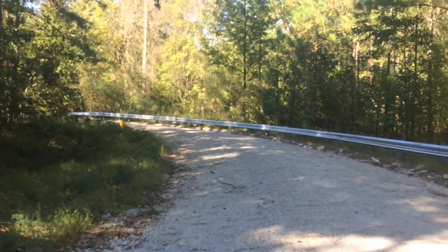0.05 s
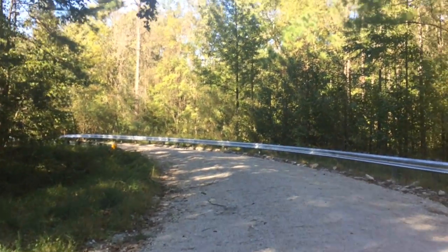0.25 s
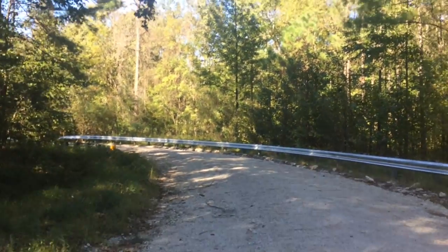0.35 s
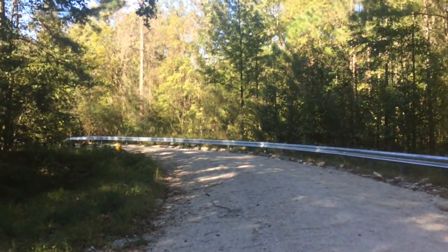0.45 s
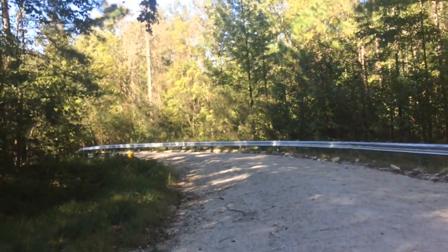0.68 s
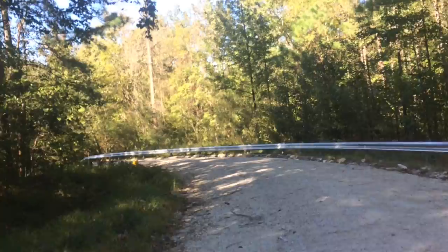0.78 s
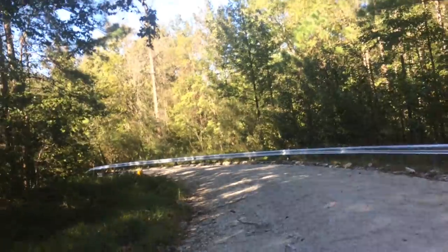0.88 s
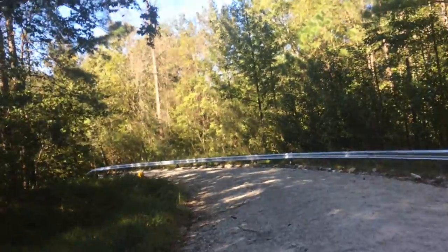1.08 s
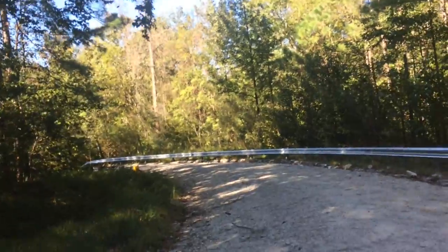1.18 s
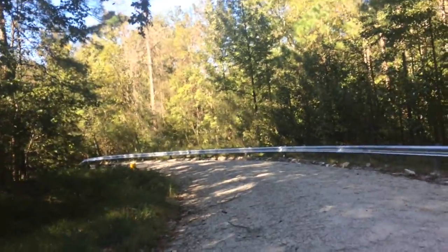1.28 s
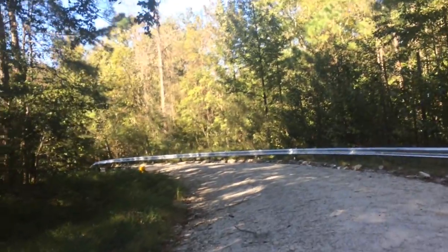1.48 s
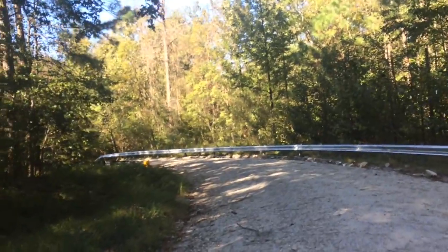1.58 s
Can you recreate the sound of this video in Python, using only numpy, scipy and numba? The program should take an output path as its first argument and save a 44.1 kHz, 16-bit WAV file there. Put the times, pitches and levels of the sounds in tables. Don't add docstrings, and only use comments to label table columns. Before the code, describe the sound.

Someone walks slowly on a stony woodland road; a heavy crunch scatters small stones, a lighter step and a lone stone crack follow, then a last soft step with a barely audible cricket, phone microphone nearby.

```python
import sys
import numpy as np
from scipy import signal
from scipy.fft import rfft, irfft
from scipy.io import wavfile
from scipy.ndimage import uniform_filter1d
from numba import njit

SR = 44100
rng = np.random.default_rng(int(sys.argv[2]) if len(sys.argv) > 2 else 0)


def gain_from_db(level_db):
    decades = np.asarray(level_db, float) / 20
    return 10 ** decades


def persist_wave(psi):
    counts = np.round(np.clip(psi, -1, 1) * 32767).astype(np.int16)
    wavfile.write(sys.argv[1], SR, np.atleast_2d(counts).T)


N = 72765

# pitch_hz, density_db (per Hz)
TREE_HISS = [
    (15, -36),
    (25, 1),
    (146, -4.5),
    (264, -13),
    (558, -16),
    (978, -18.5),
    (2930, -33.5),
    (5140, -36),
    (15000, -48),
]
# pitch_hz, width_hz, level_db
RUMBLE_BANDS = [
    (80, 62, -53),
    (142.5, 20.4, -53),
    (183.7, 20.7, -57.5),
]
# start_s, length_s, level_db
CRICKET_CHIRPS = [
    (1.428, .028, -65),
    (1.452, .036, -70),
    (1.496, .03, -73),
    (1.612, .025, -73),
]

# start_s, stones_db, thud_db and grit_db (both re stones), decay_s
HEAVY_STEP = [(0.236, -22.5, -4.5, -18, 0.027), (0.246, -19.5, 6.5, -7, 0.0078),
              (0.262, -19, -1, -14.5, 0.011), (0.274, -24, -8, -7, 0.0098), (0.287, -22.5, 4, -11, 0.0078),
              (0.299, -25.5, -1, -23, 0.0063), (0.309, -37, -14, -31, 0.016),
              (0.335, -26, -1.5, -13.5, 0.0065), (0.347, -26.5, -6.5, -17.5, 0.012),
              (0.356, -33.5, -23, -16, 0.01), (0.394, -35, -7, -15, 0.026), (0.431, -41, -18, -17, 0.031),
              (0.453, -32.5, -11, -16, 0.0065)]
SECOND_STEP = [
    (0.929, -29, -8, -16.5, 0.0076),
    (0.936, -44, -9, -16, 0.014),
    (0.946, -33.5, 2, -13, 0.011),
    (0.959, -40, -12, -14, 0.015),
    (0.973, -37.5, -9, -17, 0.019),
    (0.993, -30, -13, -20, 0.0045),
    (0.999, -30.5, -23, -17.5, 0.0075),
    (1.011, -28.5, -30, -21.5, 0.01),
    (1.041, -42, -18, -18, 0.015),
    (1.149, -42.5, -18, -18, 0.024),
]
LAST_STEP = [(1.413, -48.5, -13, -8.5, 0.028), (1.472, -43.5, -0.5, -12.5, 0.041),
             (1.495, -41.5, -25, -6, 0.017), (1.506, -35.5, -4, -12.5, 0.014),
             (1.514, -35.5, -7.5, -18, 0.023), (1.527, -29.5, -6.5, -11, 0.01),
             (1.542, -28.5, -13, -20, 0.011), (1.552, -27.5, -33, -16.5, 0.0096),
             (1.561, -32.5, -31, -15, 0.0061), (1.584, -44, -4, -8.5, 0.022),
             (1.618, -40.5, -4.5, -14.5, 0.01), (1.636, -47.5, -10, -6, 0.015)]

# start_s, peak_db, pitch_hz, cycles
SOLE_THUMPS = [
    (.2472, -21.5, 379, 3.4),
    (.236, -21.5, 236, 1.35),
    (0.261, -36.5, 200, 1.5),
    (.269, -20, 131, 1.95),
    (0.24, -31, 98, 1.4),
    (0.96, -38, 520, 2),
    (1.523, -39, 1080, 9),
    (1.534, -39, 1090, 7),
]
# start_s, peak_db, pitch_hz, top_db (bright part re peak)
PEBBLE_TICKS = [(0.2981, -23, 6270, -11), (0.426, -53, 2620, -9), (0.455, -40, 2500, -1),
                (0.4746, -40, 9640, -2), (0.477, -40.5, 2360, -4), (0.4939, -39, 3930, -8),
                (0.4995, -38, 3060, -25), (0.5207, -34.5, 2620, -21), (0.5505, -50, 2780, 11),
                (0.5615, -38.5, 3470, 5), (0.595, -44.5, 4730, 9), (0.6186, -28.5, 4530, -20),
                (0.6241, -38.5, 5130, -4), (0.6098, -54, 3460, 0), (0.645, -54, 4600, -8),
                (0.6584, -49, 4300, 2), (0.6662, -50, 3240, 8), (0.683, -58, 4000, -10),
                (0.7112, -37.5, 2420, -7), (0.752, -37, 2550, 0), (0.7748, -38, 2400, -0.5),
                (0.7802, -53, 4000, 4), (0.8762, -48, 3500, 5), (0.8507, -50, 2900, 2),
                (0.8549, -46, 2680, -1),
                (1.0088, -32.5, 6160, 3),
    (1.0975, -49, 4000, 2),
    (1.1503, -51, 3640, 0),
    (1.296, -52, 5000, 8),
    (1.3576, -49, 4760, -10),
    (1.5251, -38, 4700, -21),
    (1.5515, -36.5, 4860, -9),
    (1.586, -46, 3500, -16),
    (0.348, -42, 4800, -8),
    (0.3685, -46, 5800, -8),
]
# start_s, peak_db
SAND_TICKS = [(0.3234, -46), (0.3704, -52), (0.4074, -51), (0.4394, -52), (0.4623, -45), (0.5152, -45),
              (0.5546, -43), (0.6304, -48), (0.6574, -54), (0.7164, -58), (0.7946, -55), (0.8081, -51),
              (0.8759, -49), (0.9567, -52)]

# peak_s, peak_db,
# pitch_hz
HEEL_CRACKS = [(0.2396, -23.5, 1860), (0.2421, -32, 1320), (0.2467, -40, 2790), (0.2472, -22, 1480),
               (0.2504, -17, 390), (0.2534, -32, 1320), (0.2628, -21.5, 1760), (0.2665, -26, 700),
               (0.2682, -25, 1170), (0.274, -27.5, 2220), (0.274, -28, 1320), (0.2756, -19.5, 490),
               (0.281, -42, 3320), (0.2812, -29, 1320), (0.2855, -19, 520), (0.2868, -40, 1110),
               (0.289, -29, 1860), (0.2922, -30, 2350), (0.2941, -31, 1480), (0.299, -29, 2350)]
TOE_CRACKS = [
    (0.3364, -33, 1860),
    (0.3397, -37, 1050),
    (0.3417, -32.5, 350),
    (0.3453, -30, 1800),
    (0.3493, -29, 710),
    (0.3494, -30.5, 1820),
    (0.3594, -32, 1170),
    (0.3595, -32.5, 700),
]
SECOND_STEP_CRACKS = [(0.931, -32, 950), (0.931, -44, 1670), (0.9317, -36, 470), (0.943, -48, 1310),
                      (0.9504, -33.5, 1210), (0.9563, -38, 1170), (0.9619, -35, 920), (0.9938, -29, 1220),
                      (1.0015, -48, 930), (1.0044, -39, 1320), (1.0134, -30, 1550), (1.0141, -29.5, 1020),
                      (1.0214, -44, 1480), (1.0244, -45, 1470), (1.0436, -40, 1230)]
LAST_STEP_CRACKS = [(1.513, -39, 1690), (1.517, -34, 1760), (1.521, -35, 1170), (1.5244, -38, 1450),
                    (1.5264, -30.5, 3120), (1.5312, -29, 1330), (1.5314, -37, 2600), (1.5364, -38.5, 1130),
                    (1.5514, -33, 2800), (1.553, -42, 1770), (1.5552, -30.5, 1660), (1.5618, -34, 1480),
                    (1.561, -37, 1080)]
SCATTERED_CRACKS = [
    (0.2998, -28, 570),
    (0.3105, -33.5, 700),
    (0.4955, -38, 1370),
    (1.0996, -24, 1177),
    (1.1003, -31.5, 1700),
    (1.109, -55, 1260),
                    (0.2355, -35, 1260), (0.2640, -26, 480), (0.3125, -39, 900), (0.3250, -40, 1610),
                   (0.3990, -43, 990), (0.4030, -43, 420), (0.4340, -44, 900), (0.4460, -43, 1150),
                   (0.4560, -43, 1300), (0.4630, -44, 800), (0.9665, -40, 606), (1.1520, -47.5, 1150),
                   (1.4750, -44, 905), (1.5085, -39, 1500), (1.5450, -37, 1050), (1.5690, -49, 1310)]

# lowest_hz, highest_hz, cycles, grains_per_s, size_scatter_db, trim_db
SOLE_GRAINS = (69, 179, 3, 303.5, 4.5, -7.5)
THUD_GRAINS = (313, 685, 1.59, 1200, 2.5, -4)
STONE_GRAINS = (916, 2038, 2, 4000.5, 2, -8.5)
GRIT_GRAINS = (1976, 5515, 1.5, 12000, 0.5, -2.5)
SAND_GRAINS = (5492, 15000, 7, 20001.5, -0.5, -11)
SCRAPE_GRAINS = (5300, 7660, 6.9, 7999, 4.8, 4.7)
CRACKLE_GRAINS = (2500, 14000, 2, 400, 4, 0)


def band(hz, width):
    f = np.arange(N // 2 + 1) * SR / N
    bell = 1 / (1 + (2 * (f - hz) / width) ** 4) ** .5
    x = irfft(rfft(rng.standard_normal(N)) * bell, N)
    return x / x.std()


def walk(rate):
    k = int(SR / rate)
    x = uniform_filter1d(uniform_filter1d(rng.standard_normal(N), k), k)
    return (x - x.mean()) / x.std()


@njit
def ring(at, hz, cycles, size):
    y = np.zeros(N)
    for g in range(len(at)):
        turn = np.exp((2j * np.pi - 1 / cycles[g]) * hz[g] / SR)
        soften = np.exp(-2 * hz[g] / SR)
        z, contact = 2 * size[g] + 0j, 1.
        for i in range(int(at[g]), min(N, int(at[g] + 6 * cycles[g] * SR / hz[g]))):
            z *= turn
            contact *= soften
            y[i] += z.imag * (1 - contact)
    return y


def rings(start_s, hz, cycles, size):
    start_s, hz, cycles, size = np.array(np.broadcast_arrays(start_s, hz, cycles, size), float)
    return ring(start_s * SR, hz, cycles / 2, size)


def swell(start_s, db, decay_s, rise_s):
    start_s, db, decay_s = (np.reshape(v, (-1, 1)) for v in (start_s, db, decay_s))
    dt = np.arange(N) / SR - start_s
    rise = np.clip(dt / rise_s + .5, 0, 1)
    fall = np.exp(-np.maximum(dt, 0) / np.maximum(decay_s, .002))
    return np.sqrt(np.sum((gain_from_db(db) * rise * fall) ** 2, axis=0))


def grains(family, pressure):
    lo_hz, hi_hz, cycles, rate, scatter_db, trim_db = family
    u = rng.random((40000, 4))
    at = np.cumsum(-np.log(1 - u[:, 0])) / rate * SR
    u, at = u[at < N], at[at < N]
    hz = lo_hz * (min(hi_hz, .45 * SR) / lo_hz) ** u[:, 1]
    sign = np.sign(u[:, 3] - .5)
    size = gain_from_db(scatter_db * np.minimum(-np.log(1 - u[:, 2]), 4)) * sign
    size = size / np.sqrt(np.mean(size ** 2 * cycles / hz) * rate / 4)
    return rings(at / SR, hz, cycles, size * pressure[at.astype(int)] * gain_from_db(trim_db))


def tree_hiss():
    hz, db = np.array(TREE_HISS).T
    swell_db, flicker_db = 0, 2.5
    out, gust = 0, walk(1.5)
    for f in 28 * 2 ** np.arange(0, 9.2, 1 / 3):
        level_db = np.interp(np.log(f), np.log(hz), db) + swell_db * gust + flicker_db * walk(17)
        out = out + band(f, f / 4) * np.sqrt(f) * gain_from_db(level_db)
    return out / out.std() * gain_from_db(-50)


def rumble():
    return sum(gain_from_db(db + 0.49 * walk(12.0)) * band(hz, width) for hz, width, db in RUMBLE_BANDS)


def cricket():
    t = np.arange(N) / SR
    env = 0
    for start_s, length_s, db in CRICKET_CHIRPS:
        env = env + gain_from_db(db) * np.sin(np.pi * np.clip((t - start_s) / length_s, 0, 1)) ** .5
    pitch_hz, wobble_rad = 4635, .6
    return np.sqrt(2) * env * np.sin(2 * np.pi * pitch_hz * t + wobble_rad * walk(60))


TICK_TOP_HZ, TICK_TOP_CYCLES = 12000, 2.37
BOUNCE_S, TICK_LAG_S = 0.00073, 0.00102


def pebbles():
    start_s, db, hz, top_db = np.array(PEBBLE_TICKS).T
    u = rng.random((len(start_s), 4)).T
    body_cycles = 1.3
    parts = ((hz, body_cycles, 0),
             (hz * 2.07, body_cycles, -10),
             (7940 * (0.72 + 0.17 * u[2]), body_cycles, top_db / 2 + 1),
             (TICK_TOP_HZ * (0.87 + 0.4 * u[1]), TICK_TOP_CYCLES, top_db))
    strike = (0, 0, 1)
    bounce = (BOUNCE_S * (.5 + u[0]), -9, 0.94 + 0.77 * u[3])
    out = np.zeros(N)
    for late_s, gain_db, bend in (strike, bounce):
        for part_hz, cycles, rel_db in parts:
            pitch = np.minimum(part_hz * bend, .4 * SR)
            out += rings(start_s + late_s + TICK_LAG_S, pitch, cycles, gain_from_db(db + rel_db + gain_db))
    return out


def sand_ticks():
    start_s, db = np.array(SAND_TICKS).T
    out = np.zeros(N)
    for late_s, bend in ((0, 1.05), (BOUNCE_S, .8)):
        out += rings(start_s + late_s + TICK_LAG_S, TICK_TOP_HZ * bend, TICK_TOP_CYCLES, gain_from_db(db + 3))
    return out


def thumps():
    start_s, db, hz, cycles = np.array(SOLE_THUMPS).T
    return rings(start_s, hz, np.maximum(cycles, .5), gain_from_db(db))


def cracks():
    out = np.zeros(N)
    under_foot = HEEL_CRACKS + TOE_CRACKS + SECOND_STEP_CRACKS + LAST_STEP_CRACKS
    for peak_s, db, hz in under_foot + SCATTERED_CRACKS:
        rise_s = 1.25 / hz
        t = np.arange(int(7 * rise_s * SR)) / SR
        at = int((peak_s - rise_s) * SR)
        env = (t / rise_s * np.exp(1 - t / rise_s)) ** 2
        out[at:at + len(t)] += gain_from_db(db) * env * np.sin(2 * np.pi * hz * t)
    return out


def steps():
    start_s, stones_db, thud_db, grit_db, decay_s = np.array(HEAVY_STEP + SECOND_STEP + LAST_STEP).T
    foot = np.repeat(np.arange(3), [len(HEAVY_STEP), len(SECOND_STEP), len(LAST_STEP)])
    sole_db = thud_db + np.array([-9, -8, -8])[foot]
    sand_db = grit_db + np.array([-0.5, -3, -8.5])[foot]
    rise_s, grit_rise_s, settle_s = 0.0059, 0.007, 0.29
    out = np.zeros(N)
    for family, rel_db in ((SOLE_GRAINS, sole_db), (THUD_GRAINS, thud_db), (STONE_GRAINS, 0)):
        out += grains(family, swell(start_s, stones_db + rel_db, decay_s, rise_s))
    trickle = swell(settle_s, -55, 0.13, rise_s)
    for family, rel_db in ((GRIT_GRAINS, grit_db), (SAND_GRAINS, sand_db)):
        crunch = swell(start_s, stones_db + rel_db, decay_s, grit_rise_s)
        out += grains(family, np.hypot(crunch, trickle))
    out += grains(CRACKLE_GRAINS, swell(settle_s, -60, .2, rise_s))
    return out + grains(SCRAPE_GRAINS, swell(0.2908, -36.5, 0.0069, 0.022))


def scatter(near):
    t60_s, level_db = 0.11, -13.5
    t = np.arange(SR // 4) / SR
    tail = rng.standard_normal(len(t)) * gain_from_db(-60 * t / t60_s)
    return gain_from_db(level_db) * signal.fftconvolve(near, tail / np.sqrt(np.sum(tail ** 2)))[:N]


def scene():
    background = tree_hiss() + rumble() + cricket()
    near = pebbles() + sand_ticks() + thumps() + cracks() + steps()
    return (background + near + scatter(near))[None]


def band_limit(x):
    return signal.sosfilt(signal.butter(12, 16260, fs=SR, output="sos"), x)


def record(dry):
    low_cut = signal.butter(2, 45, "high", fs=SR, output="sos")
    top_cut = signal.ellip(6, .5, 40, 15300, fs=SR, output="sos")
    mix = signal.sosfilt(np.vstack([low_cut, top_cut]), dry)
    return band_limit(mix)


dry = scene()
out = record(dry)
persist_wave(out)
```